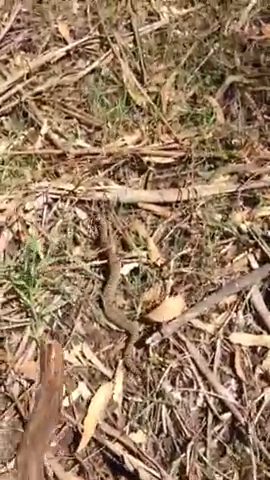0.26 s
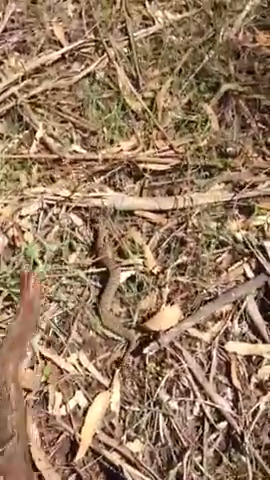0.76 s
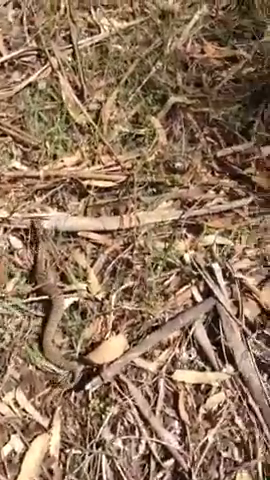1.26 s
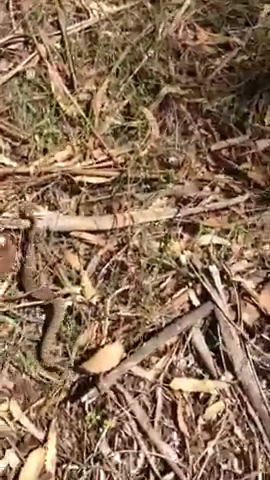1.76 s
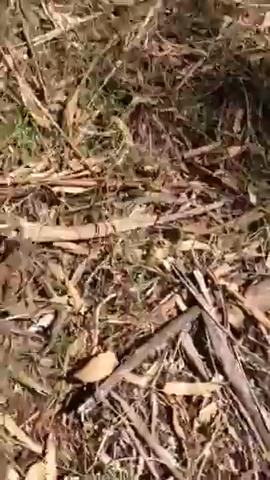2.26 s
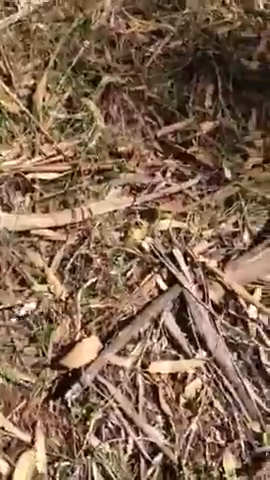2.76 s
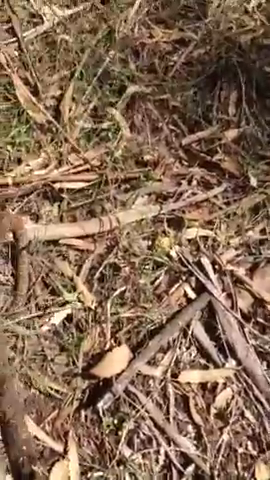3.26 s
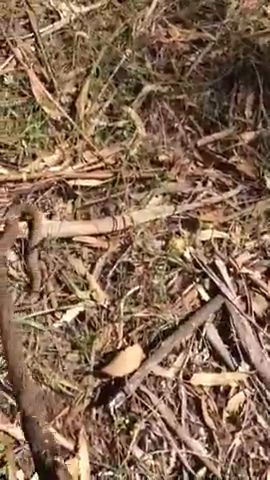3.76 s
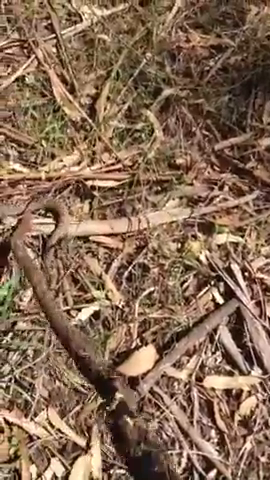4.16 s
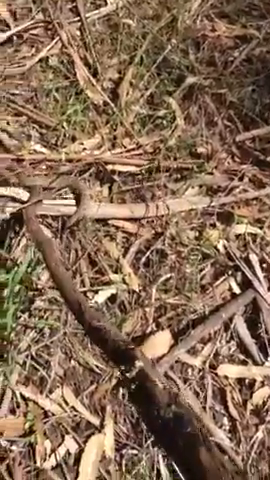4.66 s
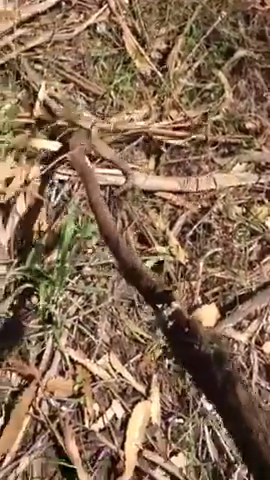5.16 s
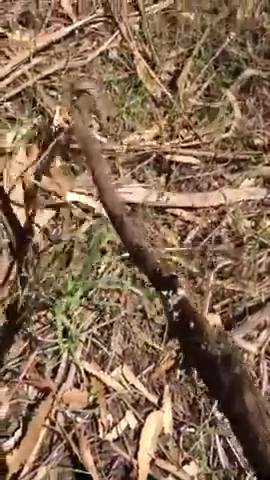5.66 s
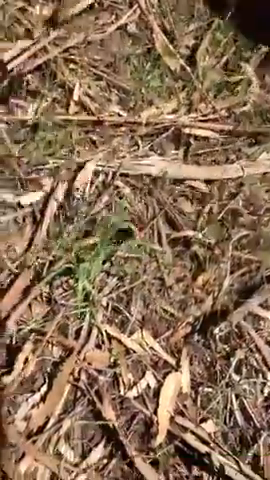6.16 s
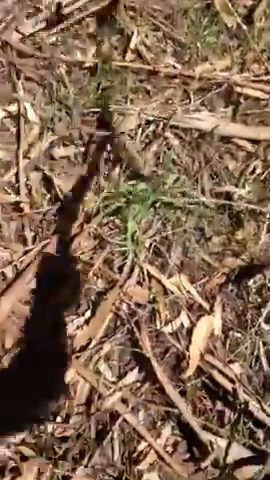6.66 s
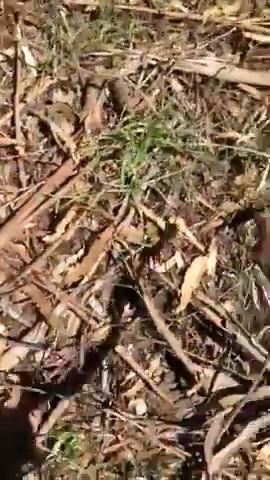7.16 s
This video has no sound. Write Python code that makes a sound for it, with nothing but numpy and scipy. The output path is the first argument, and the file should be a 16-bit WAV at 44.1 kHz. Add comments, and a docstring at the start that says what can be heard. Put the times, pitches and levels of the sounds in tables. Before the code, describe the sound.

A close, dry open-air sound: short rattling ticks of a snake's tail gather into an unbroken, bright, insect-like buzz. A stick disturbs the leaves, giving crisp twig cracks, rustles and woody taps; the middle is calmer, mostly rattle alone, then crackling returns. Near the end the buzz falters into separate bursts amid crunching leaves. Low air noise and a barely audible far engine lie underneath.

```python
"""Dry leaf litter in the open air, where a rattlesnake twitches its tail, buzzes steadily and stutters out. The
rattle is built from small collisions, each a click with hollow shells ringing after it. A stick pokes after the
snake: rustling leaves are shaped noise and tiny rings, snapping twigs, sharp tail ticks, dry taps and leaf
crackles are short ringing blows, and scraped bark is noise made to ring. Behind it lie low air noise and a
faint far engine made of three sine tones, whose hum briefly roughens into a narrow band of noise."""
import sys
import numpy as np
from scipy import signal
from scipy.fft import rfft, irfft, next_fast_len
from scipy.io import wavfile
from scipy.ndimage import uniform_filter1d, map_coordinates

SR = 44100
rng = np.random.default_rng(int(sys.argv[2]) if len(sys.argv) > 2 else 0)


def unload_audio(sound):
    """Save the sound as a 16-bit wav file, at the path given as the first command line argument."""
    columns = np.transpose(np.atleast_2d(sound))
    # keep every value between -1 and 1, then stretch to whole-number steps
    steps = np.round(np.clip(columns, -1, 1) * 32767)
    wavfile.write(sys.argv[1], SR, steps.astype(np.int16))


N = 327222
TOP_HZ = 15300  # nothing is kept above this

# colour of the outdoor air, before levelling: f/Hz, level per Hz/dB
AIR_COLOUR = [(20, -54), (60, -19.5), (100, -8), (150, -1), (300, 1.5), (500, -5), (1000, -7.5),
              (2000, -29.5), (7000, -14.5), (15000, -17)]
# far engine: t/s, firing rate f/Hz, then level/dB of its 3rd, 5th and 7th multiple
ENGINE_TONES = [(0, 43.9, -80, -73, -79), (.8, 43.96, -79, -74, -71), (2.4, 44.26, -74, -72, -66.5),
                (3.1, 44.53, -72, -66, -72), (4, 45.44, -77.5, -69, -71), (4.6, 46.4, -87, -76, -80),
                (5.3, 47.3, -72, -67.5, -69), (6, 48.4, -70, -66.5, -74), (6.6, 49.6, -78, -65, -69),
                (7, 50.2, -79, -76, -76), (7.42, 50.6, -78, -70, -75)]
# the far engine's hum roughens briefly into a narrow noisy band: t/s, level/dB
DRONE_LEVEL = [(5.9, -91), (6.4, -71), (6.7, -62), (7.1, -80)]

# colour of dry leaves, before levelling: f/Hz, level per Hz/dB
LEAF_COLOUR = [(25, -45), (100, -24), (300, -7.5), (700, -10), (1300, -9.5), (1900, -8), (3200, -6),
               (5000, -2.5), (8000, -6.5), (15000, -17.5)]
# faint crackle of the litter between pushes: t/s, level/dB
CREEP_LEVEL = [(.02, -60.5), (.11, -66), (.25, -58.5), (.35, -60.5), (.47, -58), (.75, -58), (1.25, -54),
               (2.3, -52.5), (2.6, -61.5), (3.3, -60.5), (4.25, -54), (4.33, -60), (4.45, -59),
               (4.72, -58.5), (5.1, -56), (5.7, -53), (6.6, -52), (6.95, -60.5), (7.3, -53.5)]
# pushes that rustle the leaves: t/s, length/s, level/dB
RUSTLE_PUSHES = [(0.623, 0.0093, -48.5), (0.775, 0.017, -40.5), (0.915, 0.041, -45.5), (0.975, 0.069, -41),
                 (1.15, 0.09, -42.5), (1.242, 0.094, -45.5), (1.646, 0.2, -53), (1.998, 0.035, -42),
                 (2.138, 0.13, -43.5), (2.171, 0.036, -33), (3.744, 0.2, -56), (4.035, 0.19, -53),
                 (4.37, 0.032, -55), (4.5, 0.1, -54), (4.78, 0.094, -51.5), (4.888, 0.044, -49.5),
                 (4.938, 0.088, -49.5), (5.173, 0.11, -47.5), (5.514, 0.075, -47.5), (5.752, 0.09, -48.5),
                 (5.826, 0.1, -42), (5.919, 0.09, -48), (6.03, 0.11, -52), (6.305, 0.025, -52),
                 (6.348, 0.04, -38), (6.42, 0.098, -52), (6.647, 0.023, -44), (7.098, 0.094, -43.5),
                 (7.199, 0.039, -44.5)]
RUSTLE_RISE_S, RUSTLE_FALL_S = .005, .012  # leaves give way, then settle
# bright crunches of crushed leaves: t/s, length/s, level/dB
LEAF_CRUNCHES = [(5.576, 0.028, -47), (6.38, 0.023, -57), (7.103, 0.022, -44), (7.132, 0.031, -39),
                 (7.186, 0.026, -45)]

# speed of the tail: t/s, strokes a second f/Hz
STROKE_RATE = [(0, 143), (1.42, 148), (1.55, 164), (1.78, 150), (1.88, 164), (2.05, 167), (2.35, 158),
               (2.6, 156), (2.75, 170), (2.88, 162), (3.02, 168), (3.35, 162), (3.55, 168), (3.9, 159),
               (4.2, 161), (4.35, 153), (5.02, 154), (5.12, 148), (5.3, 155), (5.48, 146), (5.72, 166),
               (6, 158), (6.25, 163), (6.6, 158), (6.68, 151), (6.77, 122), (6.83, 150), (7.05, 128),
               (7.42, 135)]
# single twitches of the tail: t/s, length/s, level/dB
TAIL_TWITCHES = [(.025, .004, -58), (.043, .011, -44), (.149, .01, -44), (.236, .02, -60), (.322, .01, -58),
                 (.394, .012, -53), (.458, .009, -48), (.509, .012, -39), (.53, .008, -43.5),
                 (.553, .019, -37), (.599, .02, -38), (.623, .008, -44), (.645, .018, -37),
                 (.685, .021, -35.5), (.712, .009, -41), (.895, .025, -35.5), (.954, .023, -35),
                 (1.009, .029, -37), (1.066, .018, -37), (1.116, .02, -37), (1.168, .028, -35),
                 (1.221, .026, -37), (1.272, .022, -40), (1.323, .022, -40), (1.369, .027, -41),
                 (6.575, .006, -31.5), (6.612, .004, -47), (7.079, .031, -40), (7.14, .024, -41),
                 (7.199, .027, -39.5), (7.262, .021, -40.5), (7.327, .025, -42), (7.387, .024, -42)]
# bouts of unbroken buzzing: start t/s, end t/s
BUZZ_BOUTS = [(.727, .88), (1.417, 6.562), (6.585, 6.597), (6.641, 6.751), (6.761, 6.785), (6.803, 7.008),
              (7.02, 7.049)]
# how hard the tail shakes while it buzzes: t/s, level/dB
BUZZ_VIGOUR = [(.73, -36), (.82, -37), (.88, -38), (1.42, -38), (1.55, -35), (1.75, -37), (1.88, -34.5),
               (2.1, -36.5), (2.19, -36.5), (2.33, -40), (2.5, -36.5), (2.65, -36.5), (3.05, -37),
               (3.5, -39), (3.92, -40.5), (4.2, -38), (4.45, -41), (4.72, -39), (5.02, -37.5),
               (5.13, -40.5), (5.36, -38.5), (5.505, -46.5), (5.56, -39), (5.65, -41.5), (5.85, -40),
               (6.17, -42.5), (6.55, -39.5), (7.05, -41.5)]
ATTACK_S, RELEASE_S = .0032, .0045  # the rattle gets going and comes to rest
# loose segments quiver on after a shake; the tail never quite rests
QUIVER_DB, SETTLE_S, REST_DB = -10, .03, -76
# colour of the keratin shell, before levelling: f/Hz, level per Hz/dB
SHELL_COLOUR = [(400, -48), (1600, -36), (3100, -20.5), (3600, -14.5), (4000, -9), (4600, -6.5),
                (5600, -7.5), (6900, 1), (8200, 1.5), (9800, -0.5), (10800, -5.5), (11900, -5),
                (13000, -12), (15300, -13)]
# main ring of the hollow segments, shifting as the tail turns: t/s, f/Hz, level beside the shell/dB
HOLLOW_RING = [(0, 8000, -8), (1.4, 7950, -7), (2.3, 8000, -8), (2.6, 8100, -3), (3.3, 8200, -8),
               (3.75, 7800, -8), (3.95, 8400, -7), (4.08, 8100, -10), (4.17, 8300, -2), (4.27, 9100, -5),
               (4.4, 7800, -12), (4.52, 7200, -7), (4.59, 8400, -2), (4.68, 7750, -5), (4.77, 7500, -12),
               (4.87, 7450, 0), (4.93, 7700, -4), (5.02, 7950, 2), (5.08, 7300, -4), (5.16, 7650, -2),
               (5.26, 7600, -8), (5.36, 8350, 1), (5.45, 8600, -4), (5.55, 7800, -15), (6.5, 7700, -16),
               (7.42, 7800, -13)]
# shell's lower ring around 5.5 kHz: t/s, level beside the shell/dB
LOW_RING_LEVEL = [(0, -14), (1.5, -12), (2.1, -9), (2.7, -16), (3.4, -15), (3.95, -9), (4.4, -6),
                  (4.7, -11), (5.1, -18), (5.6, -11), (7.42, -16)]
# steady hiss that blurs the strokes together: t/s, level beside their chatter/dB
STROKE_BLUR = [(0, 1), (.55, -2), (.8, 0), (1.4, -1), (1.7, 4), (2.7, 2), (5.3, 2), (5.7, 7), (6.5, 7),
               (6.75, -3), (7.42, -1)]

# small dry taps and leaf crackles: t/s, level/dB, lower mode f/Hz, upper mode f/Hz
TAPS_AND_CRACKLES = [(.164, -42, 1190, 1480), (0.437, -50, 1500, 2090), (0.465, -41, 1400, 1950),
                     (1.035, -37.5, 1240, 2270), (1.058, -32, 2900, 3200), (1.149, -31, 2830, 3620),
                     (1.166, -29, 2890, 3300), (1.258, -37, 1990, 2300), (1.464, -38.5, 614, 1170),
                     (1.552, -41.5, 2110, 2570), (3.888, -41.5, 1290, 1680), (4.041, -34, 740, 1670),
                     (4.076, -30, 2128, 2530), (4.131, -40, 1470, 2150), (4.168, -55, 2020, 3000),
                     (4.297, -43.5, 2280, 2670), (4.443, -47, 1840, 2080), (4.826, -33, 1300, 1630),
                     (4.873, -37, 1330, 1670), (4.912, -42, 1900, 2180), (4.964, -41, 1730, 2370),
                     (5.003, -47, 1800, 2320), (5.177, -36, 1360, 1820), (5.201, -35.5, 1400, 1880),
                     (5.273, -43, 2280, 2950), (5.836, -36, 1100, 1970), (5.971, -35, 1650, 2400),
                     (6.044, -37.5, 1150, 2250), (6.06, -38, 1100, 2230), (6.088, -41, 2270, 3300),
                     (6.136, -37, 1120, 2130), (6.147, -44, 1250, 1900), (6.159, -35, 1020, 2320),
                     (6.181, -39, 1020, 1680), (6.312, -40, 1900, 2680), (6.368, -35, 1490, 2800),
                     (6.383, -27, 3060, 3370), (6.68, -44, 1520, 1960), (7.005, -48, 2190, 2930),
                     (7.059, -40, 750, 1380), (7.161, -34, 1900, 2920), (7.198, -30, 2360, 3200),
                     (7.276, -42, 2520, 3300), (7.41, -42, 1960, 2760)]
# snapping twigs and a few sharp ticks of the twitching tail:
# t/s, tick level/dB, knock level/dB, thump level/dB, crack level/dB
SNAPS_AND_TICKS = [(.266, -30, -30, -50, -30), (0.376, -28, -31.5, -55, -40),
                   (.905, -12, -14.5, -23, -11.5), (0.972, -14, -16.5, -41, -17),
                   (0.984, -32, -21, -22.5, -10), (1.168, -30, -41, -45, -12), (1.187, -23, -15, -40, -5.5),
                   (1.194, -27, -17, -25, -5.5), (1.215, -3.5, -0.5, -8, -0.5), (1.227, -19, -8, -19, -16),
                   (1.295, -21, -43, -28, -15), (1.631, -23, -9.5, -17, -3), (1.684, -33, -7.5, -19, -2),
                   (1.986, -20, -23, -18.5, -11.5), (1.991, -15, -8, -4.5, -3),
                   (2.008, -7, -14, -14.5, -16), (2.181, -27, -32, -29, -10.5), (4.043, -36, -23, -30, -17),
                   (5.212, -31, -23, -40, -12), (5.836, -26, -26, -40, -17), (5.877, -27, -34, -50, -14),
                   (5.9, -24, -24, -47, -14), (6.073, -28, -30, -55, -17), (6.161, -30, -16, -34, -14),
                   (6.501, -36, -20.5, -53, -13.5), (6.576, -26, -33, -50, -38),
                   (7.06, -32, -26, -25.5, -24), (7.105, -25, -19, -37, -14.5), (7.114, -27, -26, -40, -12),
                   (7.148, -32, -18, -49, -14)]
# stick chattering over bark: t/s, length/s, level/dB, pitch f/Hz
BARK_SCRAPES = [(2.018, 0.0086, -37.5, 2700), (2.019, 0.019, -41.5, 2180), (2.05, 0.065, -57, 2250),
                (2.118, 0.021, -45.5, 2300), (2.147, 0.02, -40, 2230), (2.186, 0.017, -43, 2360),
                (2.187, 0.027, -41.5, 1580), (2.219, 0.031, -49.5, 1750), (4.398, 0.015, -51.5, 2020),
                (4.53, 0.0067, -44, 1900), (6.046, 0.028, -54, 2150), (6.127, 0.067, -51, 1100),
                (6.108, 0.074, -54, 2200), (6.17, 0.029, -47, 1830), (5.933, 0.027, -55, 2000),
                (7.134, 0.044, -44, 2240)]


def amp(db):
    """Decibels to gain."""
    return 10 ** (np.asarray(db) / 20)


def unit(x):
    """Scale to an average (rms) level of 1."""
    return x / np.sqrt(np.mean(x ** 2) + 1e-20)


def even(x, size):
    """Scale to rms 1 over each stretch of size samples, keeping the fine grain."""
    return x / np.sqrt(np.abs(uniform_filter1d(x * x, size)) + 1e-20)


def curves(rows):
    """One value a sample for each column after the time, by straight lines between rows."""
    s, *columns = np.transpose(rows)
    return np.squeeze([np.interp(np.arange(N) / SR, s, c) for c in columns])


def wobble(rate):
    """A smooth random curve with rate random points a second."""
    knots = rng.standard_normal(int(N * rate / SR) + 4)
    return map_coordinates(knots, [np.arange(N) * rate / SR])


def coloured(x, points):
    """Filter x to a table of frequencies and gains; the filter never sounds before its input."""
    size = next_fast_len(N + SR // 2)
    hz, db = np.transpose(points)
    bins_hz = np.fft.rfftfreq(2 * size, 1 / SR)
    gain = amp(np.interp(np.log(bins_hz + 1), np.log(hz), db))
    # folding the cepstrum gives the gain a minimum-phase response
    cepstrum = irfft(np.log(gain))[:size]
    cepstrum[1:] *= 2
    response = np.exp(rfft(cepstrum, 2 * size))
    return irfft(rfft(x, 2 * size) * response)[:N]


def band(x, lo_hz, hi_hz):
    """Keep the frequencies between two limits."""
    sos = signal.butter(2, [lo_hz, min(hi_hz, TOP_HZ)], "band", fs=SR, output="sos")
    return signal.sosfilt(sos, x)


def burst(t, length, rise, fall):
    """Envelope that swells, holds for length and dies away."""
    return (1 - np.exp(-t / rise)) * np.exp(-np.maximum(t - length, 0) / fall)


def add(track, s, sound):
    """Mix a sound in at time s."""
    part = track[max(round(s * SR), 0):][:len(sound)]
    part += sound[:len(part)]


def pings(times, hz, sizes, decay_s):
    """Many tiny rings that swell and fade, each with its own time, pitch and size."""
    k = np.arange(SR // 60)
    u = k / SR / decay_s
    waves = sizes[:, None] * np.sin(2 * np.pi * hz[:, None] * k / SR) * u * np.exp(-u)
    at = (times[:, None] * SR).astype(int) + k
    return np.bincount(at.ravel(), waves.ravel(), N)[:N]


def outdoors(air_db=-60.0):
    """Low air noise and a far engine whose tones rise as it gathers speed, its hum briefly roughening."""
    drift_db = .5 * wobble(3)
    air = unit(coloured(rng.standard_normal(N), AIR_COLOUR)) * amp(air_db + drift_db)
    firing_hz, *levels_db = curves(ENGINE_TONES)
    phase = 2 * np.pi * np.cumsum(firing_hz * (1 + .004 * wobble(6))) / SR
    hum = np.zeros(N)
    for multiple, db in zip((3, 5, 7), levels_db):
        tone = np.sqrt(2) * np.sin(multiple * phase)  # rms 1
        hum += amp(db + 1.8 * wobble(6)) * tone
    drone = unit(band(rng.standard_normal(N), lo_hz=330, hi_hz=380)) * amp(curves(DRONE_LEVEL))
    return air + hum + drone


def clicks(times, sizes):
    """Impulses pointing up or down at random, at the given times."""
    at = np.round(np.ravel(times) * SR).astype(int).clip(0)
    return np.bincount(at, np.ravel(sizes) * rng.choice([-1, 1], len(at)), N)[:N]


def stirring():
    """How much the leaves move: each push swells, holds and settles, over a faint creep."""
    power = amp(curves(CREEP_LEVEL) + 1.3 * wobble(22)) ** 2
    t = np.arange(SR // 2) / SR
    for s, length, db in RUSTLE_PUSHES:
        push = amp(db) * burst(t, length, RUSTLE_RISE_S, RUSTLE_FALL_S)
        add(power, s, push ** 2)
    return np.sqrt(power)


def leaves(spike_db=3.5, blade_db=-9, blade_hz=2300):
    """Dead leaves crackle in clumps of tiny fractures over a soft rub."""
    count = int(2000 * N / SR)  # 2000 fractures a second
    fracture_sizes = amp(spike_db * rng.exponential(size=count).clip(0, 3))
    grains = unit(clicks(rng.random(count) * N / SR, fracture_sizes))
    rub = amp(-2) * rng.standard_normal(N)
    crackle = (grains + rub) * amp(2.2 * wobble(140))  # the wobble makes the clumps
    body = unit(coloured(crackle, LEAF_COLOUR))
    # small leaf blades ring at pitches of their own, up to 0.8 octave either side of blade_hz
    when, pitch, size = rng.random((3, count // 5))
    blade_pitch = blade_hz * 2 ** (1.6 * (pitch - .5))
    blades = pings(when * N / SR, blade_pitch, amp(9 * size), decay_s=.0013)
    blades = unit(band(blades, lo_hz=900, hi_hz=5000))
    crush, t = np.zeros(N), np.arange(SR // 8) / SR
    for s, length, db in LEAF_CRUNCHES:
        add(crush, s, amp(db) * burst(t, length, rise=0.00049, fall=0.0042))
    bright = even(band(crackle, lo_hz=2430, hi_hz=6650), size=SR // 60)
    rustle = even(body + amp(blade_db) * blades, size=SR // 60)
    return rustle * stirring() + crush * bright


def stroke_times():
    """The tail turns at a slightly uneven rate; every twitch or bout starts with a fresh stroke."""
    turns = np.cumsum(curves(STROKE_RATE) * (1 + .015 * wobble(25))) / SR
    onsets = np.sort([0] + [round(row[0] * SR) for row in TAIL_TWITCHES + BUZZ_BOUTS])
    # count whole turns from the latest onset
    latest = onsets[np.searchsorted(onsets, np.arange(N), "right") - 1]
    regular = np.flatnonzero(np.diff(np.floor(turns - turns[latest])) > 0)
    # leave out a regular stroke if a fresh one follows within 1/300 s
    clear = latest[np.minimum(regular + SR // 300, N - 1)] == latest[regular]
    strokes = np.sort(np.r_[onsets, regular[clear]])
    return strokes.clip(0, N - SR // 500) / SR + .001


def shaking(waver_db=0.37):
    """How hard the tail shakes: bouts of buzzing and single twitches, each leaving a quiver behind."""
    buzzing, t = np.zeros(N), np.arange(N) / SR
    for start, end in BUZZ_BOUTS:
        add(buzzing, start, burst(t, end - start, ATTACK_S, RELEASE_S))
    effort = buzzing * amp(curves(BUZZ_VIGOUR) + waver_db * wobble(17))
    for s, length, db in TAIL_TWITCHES:
        add(effort, s, amp(db) * burst(t[:SR // 8], length, ATTACK_S, RELEASE_S))
    keep = np.exp(-1 / (SETTLE_S * SR))
    quiver = amp(QUIVER_DB) * signal.lfilter([1 - keep], [1, -keep], effort)
    return np.hypot(effort, quiver + amp(REST_DB))


def shifting(x, depth_db, span_hz, span_s):
    """x with a colour that changes at random, in patches about span_hz wide and span_s long."""
    hz, t, z = signal.stft(x, SR, nperseg=256)
    knots = rng.standard_normal((64, 512))
    grid = np.meshgrid(hz / span_hz, t / span_s, indexing="ij")
    field = map_coordinates(knots, grid, mode="mirror")
    return signal.istft(z * amp(depth_db * field), SR, nperseg=256)[1][:N]


def rattle(scatter_db=1.8, hiss_db=0.5):
    """At each turn of the tail the loose segments collide one after another, and their hollow shells ring."""
    starts = stroke_times()
    # three collisions a stroke, one at random in each third of 4.3 ms
    place = (np.arange(3) + rng.random((len(starts), 3))) / 3
    times = starts[:, None] + .0043 * place
    sizes = amp(scatter_db * rng.standard_normal(place.shape).clip(-2, 2))
    blows = np.bincount((times.ravel() * SR).astype(int), sizes.ravel() ** 2, N)[:N]
    # each collision is a dry click: six very short rings spread over the treble
    spread, lag = rng.random((2, times.size, 6))
    click_hz = 3800 + 11500 * (np.arange(6) + spread) / 6
    click_times = times.reshape(-1, 1) + .001 * lag
    ticks = unit(pings(click_times.ravel(), click_hz.ravel(), np.repeat(sizes, 6), decay_s=.00022))
    # it chatters for about a millisecond, and the litter scatters a little into the gaps
    u = np.arange(SR // 200) / SR / .0003
    chatter = unit(np.sqrt(np.convolve(blows, u * np.exp(-u))[:N]))
    hiss_level = amp(hiss_db) * np.hypot(chatter, amp(curves(STROKE_BLUR)))
    hiss = hiss_level * rng.standard_normal(N)
    shell = unit(coloured(ticks + hiss, SHELL_COLOUR))
    low = chatter * rng.standard_normal(N)
    for _ in range(2):  # twice for steeper edges
        low = band(low, lo_hz=4600, hi_hz=6700)
    low = unit(low)
    # the first collision rings the main hollow; the later ones ring other segments at pitches of their own
    ring_hz, strength_db = curves(HOLLOW_RING)
    pitch = ring_hz[(starts * SR).astype(int)] * (1 + .03 * rng.standard_normal(len(starts)))
    ring = unit(pings(times[:, 0], pitch, sizes[:, 0], decay_s=.0006))
    later = times[:, 1:].ravel()
    stray_hz = 8200 * np.exp(.2 * rng.standard_normal(len(later)).clip(-2, 2))
    strays = unit(pings(later, stray_hz, sizes[:, 1:].ravel(), decay_s=.0005))
    hollows = band(amp(strength_db) * ring + amp(-9) * strays, lo_hz=5000, hi_hz=13000)
    # the colour shifts as the tail turns among the leaves
    buzz = shell + amp(curves(LOW_RING_LEVEL)) * low + hollows
    buzz = shifting(buzz, depth_db=2.0, span_hz=450, span_s=.05)
    return even(buzz, size=SR // 30) * shaking()


def taps_and_crackles(t60=0.021, grit_db=-2):
    """Small dry taps and leaf crackles: each a two-mode ring with grit, fading 60 dB in t60 seconds."""
    out, t = np.zeros(N), np.arange(SR // 10) / SR
    for s, db, *modes in TAPS_AND_CRACKLES:
        ring = sum(np.sin(2 * np.pi * (hz * t + rng.random())) for hz in modes)
        grit = unit(band(rng.standard_normal(len(t)), lo_hz=1150, hi_hz=4600))
        envelope = amp(db - 60 * t / t60) * (1 - np.exp(-t / 0.0011))
        add(out, s, envelope * (ring + amp(grit_db) * grit))
    return out


def blow(t, lo_hz, hi_hz, t60, tail_db):
    """A sharp push and the short noisy ring after it in one band, with unit energy."""
    ring = rng.standard_normal(len(t)) * amp(-60 * t / t60)
    push = t == 0  # a single-sample click
    x = band(push + amp(tail_db) * ring / np.linalg.norm(ring), lo_hz, hi_hz)
    return x / np.linalg.norm(x)


def snaps_and_ticks():
    """Snapping twigs and a few sharp tail ticks: each mixes a thump, a knock, a crack and a tick."""
    out, t = np.zeros(N), np.arange(SR // 10) / SR
    for s, tick_db, knock_db, thump_db, crack_db in SNAPS_AND_TICKS:
        thump = amp(thump_db) * blow(t, lo_hz=253, hi_hz=900, t60=0.01, tail_db=0.0)
        knock = amp(knock_db) * blow(t, lo_hz=860, hi_hz=3200, t60=0.046, tail_db=0.0)
        crack = amp(crack_db) * blow(t, lo_hz=3040, hi_hz=6460, t60=0.022, tail_db=-3.0)
        tick = amp(tick_db) * blow(t, lo_hz=3000, hi_hz=11200, t60=.005, tail_db=5)
        add(out, s, thump + knock + crack + tick)
    return out


def resonate(x, hz, width_hz):
    """One resonance: shift its pitch down to zero, smooth, and shift back up."""
    carrier = np.exp(2j * np.pi * np.cumsum(hz * np.ones(len(x))) / SR)
    pole = np.exp(-np.pi * width_hz / SR)
    return (signal.lfilter([1 - pole], [1, -pole], x / carrier) * carrier).real


def scrapes():
    """Stick and slip on bark, as rough noise, makes a thin piece of wood ring."""
    out, t = np.zeros(N), np.arange(SR // 8) / SR
    for s, length, db, hz in BARK_SCRAPES:
        slips = resonate(rng.standard_normal(len(t)), hz, width_hz=2500)
        ring = unit(resonate(slips, hz, width_hz=200))
        add(out, s, amp(db) * ring * burst(t, length, rise=0.00031, fall=0.0086))
    return out


def scene():
    """All the sounds add up at one microphone in the open air."""
    contacts = taps_and_crackles() + snaps_and_ticks() + scrapes()
    return (outdoors() + leaves() + rattle() + contacts)[None]


def record(dry):
    """The microphone keeps nothing above its band limit."""
    return irfft(rfft(dry) * (np.fft.rfftfreq(N, 1 / SR) < TOP_HZ), N)


dry = scene()
out = record(dry)
unload_audio(out)
```